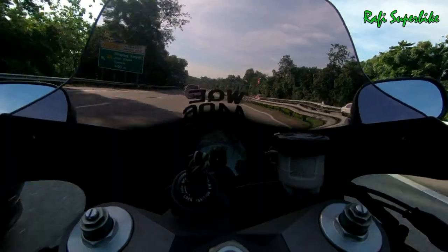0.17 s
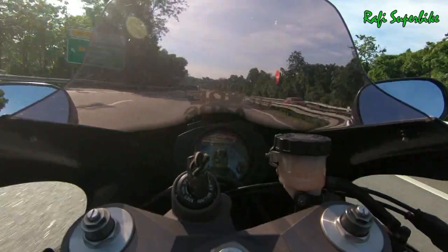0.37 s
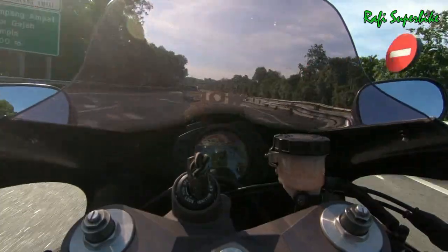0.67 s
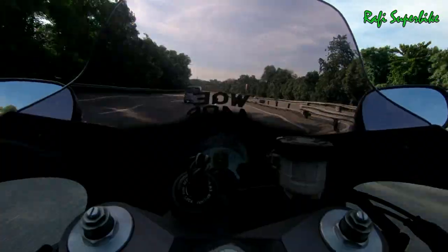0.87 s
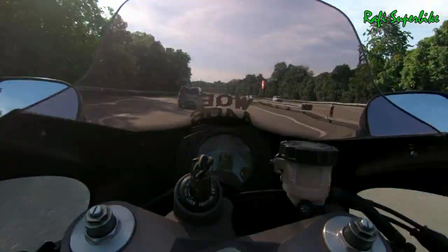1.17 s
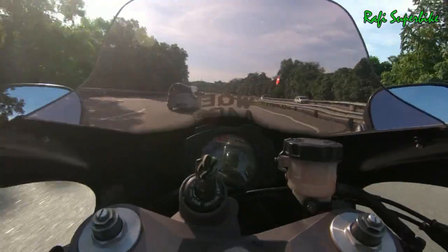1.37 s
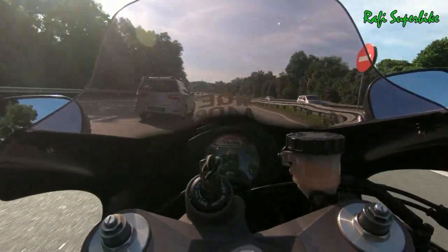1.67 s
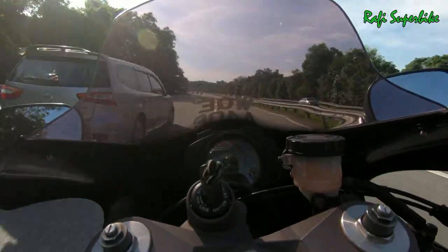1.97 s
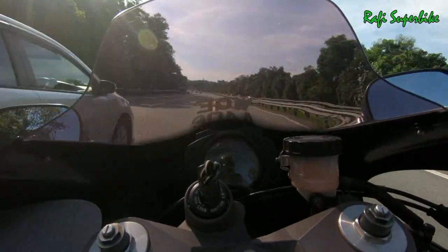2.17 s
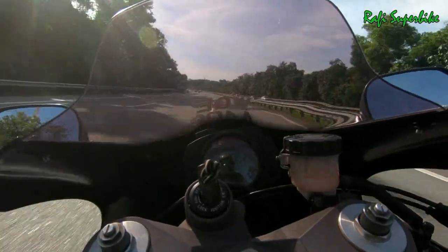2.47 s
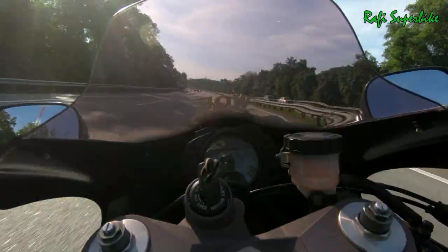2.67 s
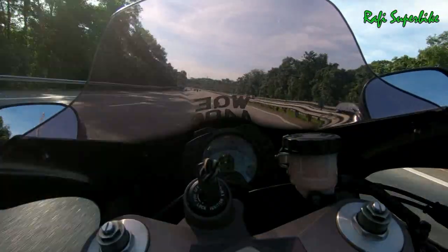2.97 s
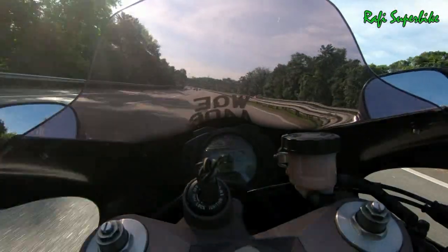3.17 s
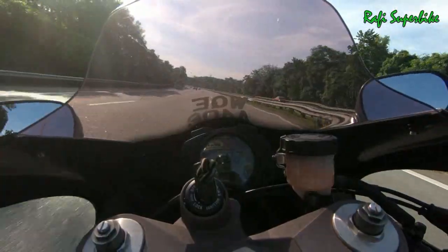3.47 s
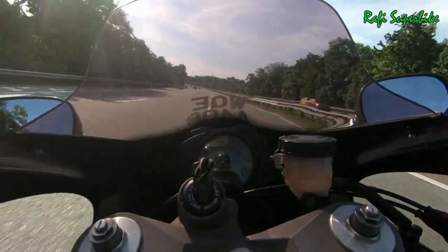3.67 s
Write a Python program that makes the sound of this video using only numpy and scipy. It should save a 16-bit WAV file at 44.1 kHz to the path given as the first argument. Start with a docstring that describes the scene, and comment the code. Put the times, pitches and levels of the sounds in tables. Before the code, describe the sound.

A sports motorcycle engine drones at highway speed, then eases off, amid buffeting wind.

```python
"""On a highway, behind the windscreen of a four-cylinder sports motorcycle.
The engine pulls: the airbox booms at the firing rate and the intake snarls.
After two seconds the throttle eases, the revs sag, the gears whine and three eddies slap.
Wind buffets and hisses throughout; tyre hiss swells beside overtaken cars.
A limiter pushes everything down while the boom is loud."""
import sys
import numpy as np
from scipy.fft import rfft, irfft, next_fast_len
from scipy.io import wavfile
from scipy.ndimage import uniform_filter1d, map_coordinates

SR = 44100
rng = np.random.default_rng(int(sys.argv[2]) if len(sys.argv) > 2 else 0)


def materialize(psi):
    """Save the field psi as 16-bit PCM at rate SR to the path in sys.argv[1].

    A 1-D psi becomes a single channel; in a 2-D psi each row is a channel.
    """
    bounded = np.clip(np.atleast_2d(psi).T, -1, 1)
    quanta = np.round(bounded * 32767).astype(np.int16)
    wavfile.write(sys.argv[1], SR, quanta)


N = 168462
CYLINDERS = 4
# wind rumble spectrum (frequency [Hz], relative density [dB])
RUMBLE_SPECTRUM = [(15, -5.5), (30, -13), (55, -3), (105, 1.5), (135, -1), (190, -6), (300, -10),
                   (450, -24.5), (700, -49.5), (1500, -49.5), (4000, -84)]


def amp(db):
    """Decibels to gain."""
    return 10 ** (np.asarray(db) / 20)


def unit(x):
    """Scale to rms 1."""
    return x / np.sqrt(np.mean(x ** 2) + 1e-20)


def at_hz(points, hz):
    """Read (frequency [Hz], value) points on a log axis."""
    knots_hz, values = np.transpose(points)
    return np.interp(np.log(hz + 1), np.log(knots_hz + 1), values)


def curves(rows):
    """One per-sample curve for each column after the time."""
    times_s, *columns = np.transpose(rows)
    return [np.interp(np.arange(N) / SR, times_s, column) for column in columns]


def wobble(rate_hz):
    """Smooth random curve, rate_hz knots a second."""
    knots = rng.standard_normal(2048)
    grid = np.arange(0, N + 32, 32)
    spline = map_coordinates(knots, [grid * rate_hz / SR], mode="wrap")
    return np.interp(np.arange(N), grid, spline)


def filtered(x, response):
    """Apply the frequency response response(hz)."""
    size = next_fast_len(N + SR // 2)
    hz = np.fft.rfftfreq(size, 1 / SR)
    return irfft(rfft(x, size) * response(hz), size)[:N]


def noise(spectrum):
    """Coloured noise, rms 1."""
    return unit(filtered(rng.standard_normal(N), lambda hz: amp(at_hz(spectrum, hz))))


def partial(phase, rough, flutter_hz):
    """Tone of rms near 1, wavering in level and phase."""
    in_phase = (1 + rough * wobble(flutter_hz)) * np.sin(phase)
    quadrature = rough * wobble(flutter_hz) * np.cos(phase)
    return np.sqrt(2) * (in_phase + quadrature)


def airbox(firing_phase):
    """Cavity booming at the firing rate and its octave, also rung by turbulent air."""
    # firing-rate boom (time [s], level [dB])
    boom_levels = [(.06, -26.5), (.2, -16.5), (.32, -12), (.45, -6), (.62, -3.5), (1.2, -1), (1.7, -2),
                   (2.03, -3.5), (2.08, -7), (2.16, -5), (2.21, -13), (2.26, -14.5), (2.5, -20.5),
                   (2.8, -16.5), (3.0, -10), (3.22, -6.5), (3.5, -15), (3.58, -6), (3.82, -10)]
    # its octave (time [s], level [dB])
    octave_levels = [(.06, -24.5), (.19, -16.5), (.29, -18.5), (.36, -34.5), (.5, -29), (.9, -24.5),
                     (1.22, -36), (1.29, -21), (1.45, -23.5), (1.7, -23), (2.02, -23.5), (2.18, -37.5),
                     (2.8, -37.5), (3.82, -47)]
    centre_hz, width_hz = 274.3, 84

    def cavity(hz):
        damping = 1j * hz * width_hz
        return (damping / (centre_hz ** 2 - hz ** 2 + damping)) ** 2

    boom = amp(curves(boom_levels)[0]) * partial(firing_phase, rough=0.034, flutter_hz=40.1)
    octave = amp(curves(octave_levels)[0]) * partial(2 * firing_phase, rough=0.18, flutter_hz=29.56)
    ring = amp(-21) * unit(filtered(rng.standard_normal(N), cavity))
    return boom + octave + ring


def intake_snarl(cycle_phase, cycle_hz):
    """Unequal cylinders excite the cycle-rate orders; some swell on crossing an intake resonance."""
    # engine load (time [s], gain [dB])
    load = [(.06, -0.5), (.3, -1), (.6, -2), (1.3, 0.5), (2.03, -3.5), (2.06, -12.5), (2.4, -16.5),
            (3.82, -9.5)]
    # turbulent intake air (frequency [Hz], relative density [dB])
    rasp_spectrum = [(300, -13), (850, 14), (1200, -38.5), (1500, 0.5), (1750, 18), (2200, -15),
                     (3100, -15), (6000, -21), (9000, -52), (13000, -89)]
    # orders off resonance (frequency [Hz], level before load [dB])
    order_floor = [(330, -38), (600, -50.5), (820, -37), (1050, -47), (1350, -53.5), (1600, -37.5),
                   (1950, -45), (2500, -56.5), (3100, -58), (4300, -61)]
    # intake resonances (order, centre [Hz], half-width [Hz], peak before load [dB])
    resonances = [(6, 424, 34, -24.5), (12, 775, 29, -27.5), (13, 880, 55, -40.5), (14, 902, 54, -28.5),
                  (16, 1075, 68, -41.5), (20, 1410, 36, -40.5), (24, 1680, 58, -23.5), (25, 1775, 38, -34),
                  (27, 1742, 55, -28), (28, 1775, 26, -30), (28, 1890, 30, -32.5), (41, 2660, 61, -43),
                  (45, 3105, 60, -37.5), (47, 3050, 63, -43), (50, 3430, 120, -45), (61, 3950, 72, -43.5)]
    puffs = 1 + 0.9 * np.cos(cycle_phase)
    snarl = amp(-34.5) * unit(noise(rasp_spectrum) * puffs)
    for order in range(CYLINDERS + 1, 64):
        if order == 2 * CYLINDERS:  # the airbox's octave
            continue
        order_hz = order * cycle_hz
        level_db = at_hz(order_floor, order_hz)
        for resonant_order, centre_hz, half_width_hz, peak_db in resonances:
            if resonant_order == order:
                detune = (order_hz - centre_hz) / half_width_hz
                level_db = np.maximum(level_db, peak_db - 3 * detune ** 4)
        phase = order * cycle_phase + rng.uniform(0, 2 * np.pi)
        snarl += amp(level_db) * partial(phase, rough=0.18, flutter_hz=28.05)
    return amp(curves(load)[0]) * snarl


def wind():
    """Eddies off the windscreen: low buffeting and fluttering hiss with shared gusts."""
    # wind strength (time [s], buffet [dB], hiss [dB])
    levels = [(.06, -18, -28), (.3, -13.5, -24), (.5, -19.5, -28), (1.2, -15.5, -27), (1.9, -18.5, -29),
              (2.2, -17.5, -27.5), (2.27, -14, -25), (2.42, -15, -26.5), (2.8, -17, -27.5), (3.2, -11, -22),
              (3.5, -10.5, -21), (3.6, -12, -22.5), (3.82, -14.5, -24)]
    # wind hiss (frequency [Hz], relative density [dB])
    hiss_spectrum = [(290, -14.5), (500, 4), (536, 1.5), (562, 0), (647, -1), (710, -5), (770, -3.5),
                     (836, -6), (962, -8), (1040, -2.5), (1130, -9), (1430, -3), (1790, -6), (2030, -4.5),
                     (2630, -8), (2790, -6.5), (3480, -7.5), (4660, -11), (5480, -16.5), (6460, -17.5),
                     (8160, -31.5), (10600, -62), (18000, -120)]
    buffet_db, hiss_db = curves(levels)
    gust_db = wobble(rate_hz=24)
    buffet = unit(noise(RUMBLE_SPECTRUM) * amp(gust_db))
    hiss = unit(noise(hiss_spectrum) * amp(0.4 * gust_db + 0.5 * wobble(rate_hz=69.3)))
    return amp(buffet_db) * buffet + amp(hiss_db) * hiss


def tyres():
    """Rubber hissing on asphalt, swelling beside overtaken cars."""
    # hiss swells (time [s], level [dB])
    levels = [(.06, -40), (.32, -35), (.6, -43.5), (1.2, -39), (1.9, -43.5), (2.2, -42.5), (2.48, -40.5),
              (2.75, -51.5), (3.15, -43), (3.5, -38.5), (3.82, -41.5)]
    # tyre hiss (frequency [Hz], relative density [dB])
    spectrum = [(500, -13.5), (2000, -10), (4000, 0.5), (6800, 3.5), (8300, -12.5), (10000, -17.5),
                (12000, -30.5), (15000, -56.5)]
    return amp(curves(levels)[0]) * noise(spectrum)


def gear_whine(cycle_phase):
    """Gears singing at cycle-rate orders on the eased throttle."""
    # whine envelope (time [s], gain [dB])
    envelope = [(2.2, -52.5), (2.35, -40), (2.58, -37.5), (2.75, -44.5), (2.95, -37), (3.2, -39.5),
                (3.82, -43)]
    # gear tones (order, relative level [dB])
    orders = [(12, -4), (16, -8), (22, -3), (25, -10), (30, 0.5), (32, -6), (42, -6), (53, -9.5)]
    tones = sum(amp(db) * partial(order * cycle_phase, rough=0.4, flutter_hz=35.03)
                for order, db in orders)
    return amp(curves(envelope)[0]) * tones


def air_slaps():
    """Single eddies striking near the microphone."""
    # strikes (time [s], peak level [dB])
    strikes = [(2.263, -24.5), (2.547, -29), (2.672, -23.5)]
    # slap noise (frequency [Hz], relative density [dB])
    spectrum = [(100, -42), (400, -14), (1100, -7), (1600, 4), (2400, -19), (5000, -23), (9000, -44),
                (13000, -91)]
    half_width_s = 0.006
    t = np.arange(N) / SR
    envelope = sum(amp(db) * np.exp(-np.square((t - at_s) / half_width_s)) for at_s, db in strikes)
    return noise(spectrum) * envelope


def scene():
    """A faint rumble, then the ride cuts in; one shaft speed drives boom, snarl and whine."""
    # engine speed (time [s], firing rate [Hz])
    speed = [(.06, 250.2), (.5, 258.3), (1.0, 267), (1.5, 275.4), (2.06, 285.6), (2.11, 270), (2.16, 255),
             (2.21, 244), (2.26, 270), (2.34, 266), (3.0, 263.5), (3.5, 260.5), (3.55, 247), (3.66, 257),
             (3.82, 255)]
    start_s = 0.058
    cycle_hz = curves(speed)[0] / CYLINDERS  # four-stroke cycle: each cylinder fires once
    cycle_phase = 2 * np.pi * np.cumsum(cycle_hz) / SR
    whine = gear_whine(cycle_phase)
    engine = airbox(CYLINDERS * cycle_phase) + intake_snarl(cycle_phase, cycle_hz) + whine
    ride = engine + wind() + tyres() + air_slaps()
    faint_rumble = amp(-72) * noise(RUMBLE_SPECTRUM)
    return np.where(np.arange(N) / SR >= start_s, ride, faint_rumble)[None]


def record(dry):
    """Limiter with fast attack and slow release, then a low-pass."""
    ceiling, release_db_per_s, smooth_s = 0.75, 13, 0.012
    cutoff_hz = 15100
    recovery_db = release_db_per_s * np.arange(N) / SR
    over_db = 20 * np.log10(np.maximum(np.abs(dry[0]) / ceiling, 1))
    duck_db = np.maximum.accumulate(over_db + recovery_db) - recovery_db
    gain = amp(-uniform_filter1d(duck_db, int(smooth_s * SR)))
    return filtered(dry[0] * gain, lambda hz: hz < cutoff_hz)[None]


dry = scene()
out = record(dry)
materialize(out)
```